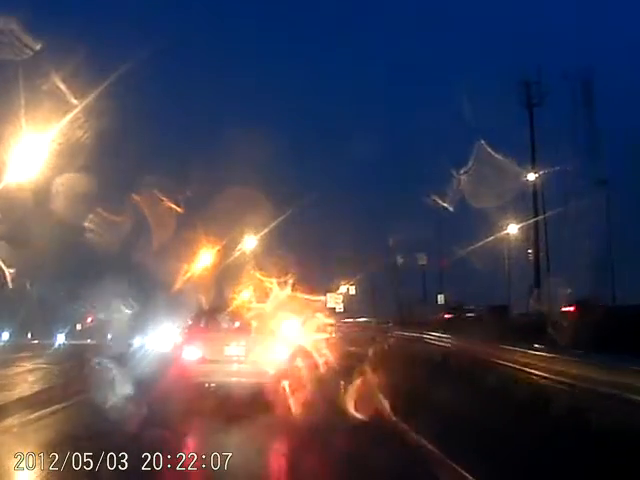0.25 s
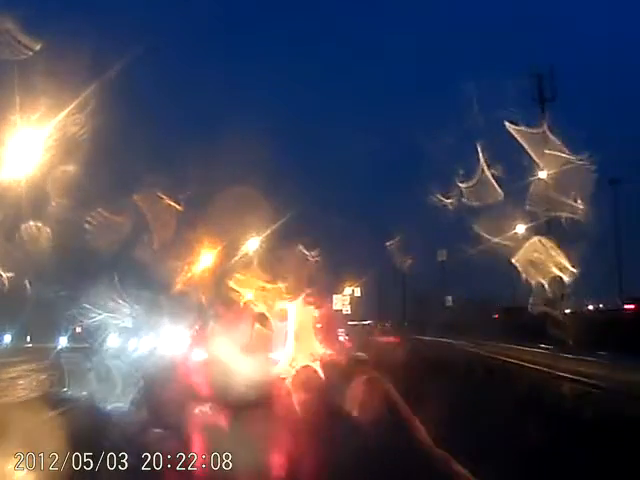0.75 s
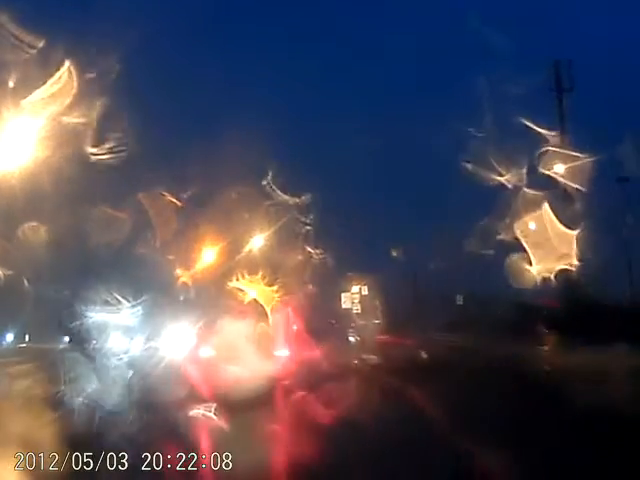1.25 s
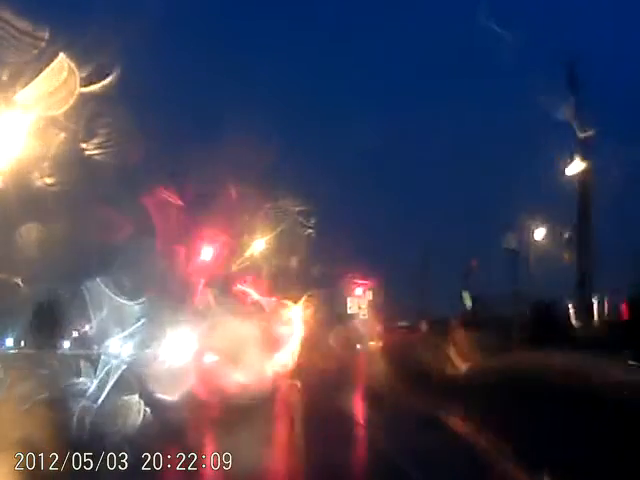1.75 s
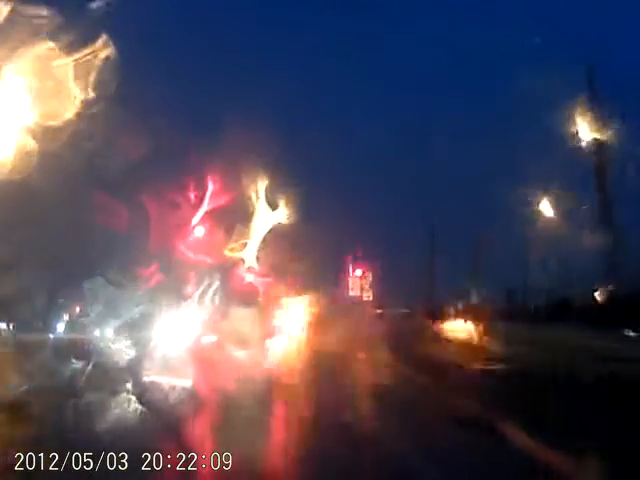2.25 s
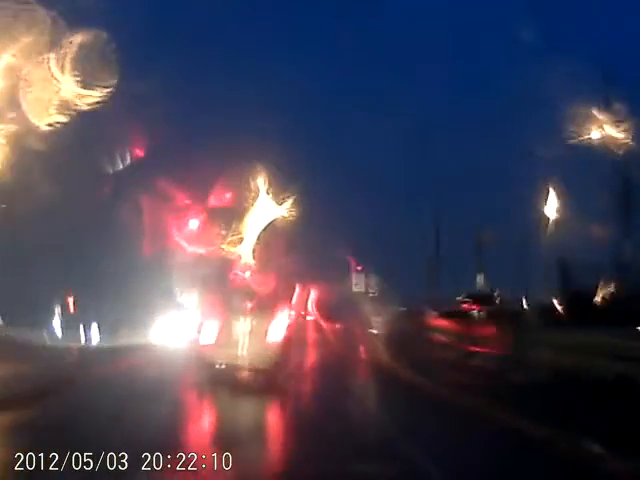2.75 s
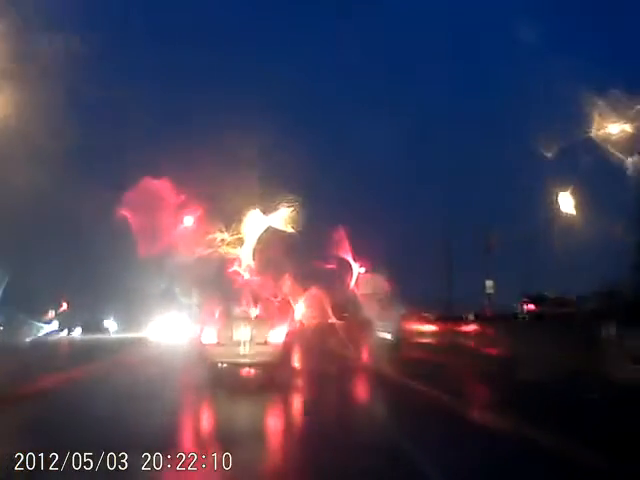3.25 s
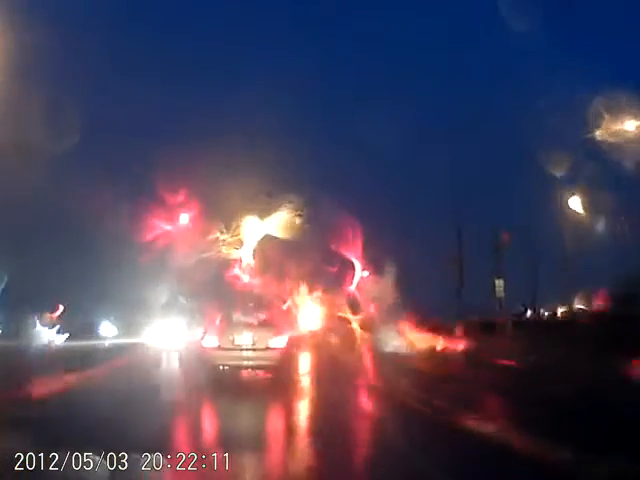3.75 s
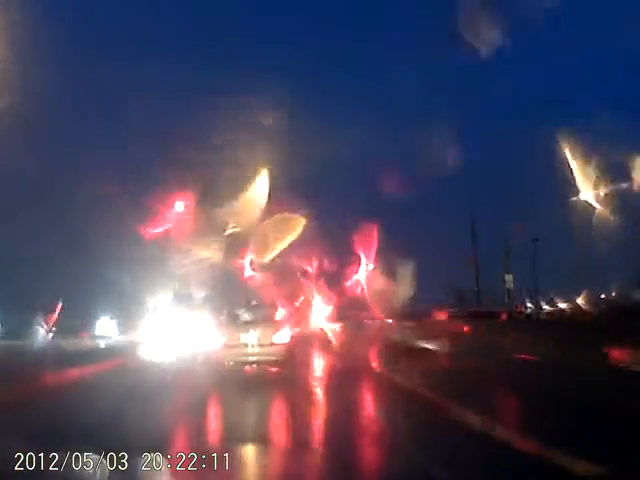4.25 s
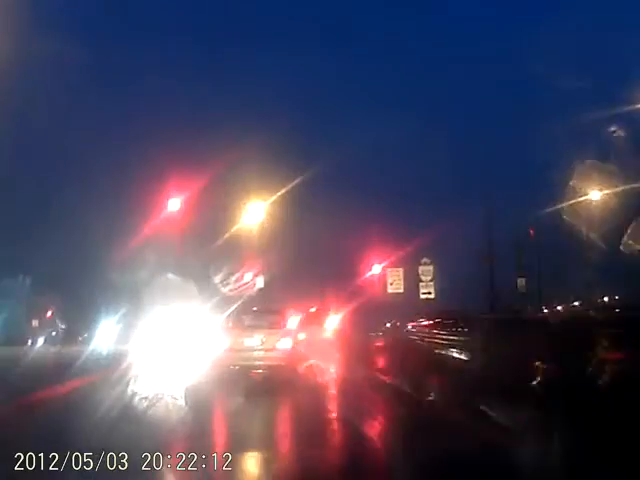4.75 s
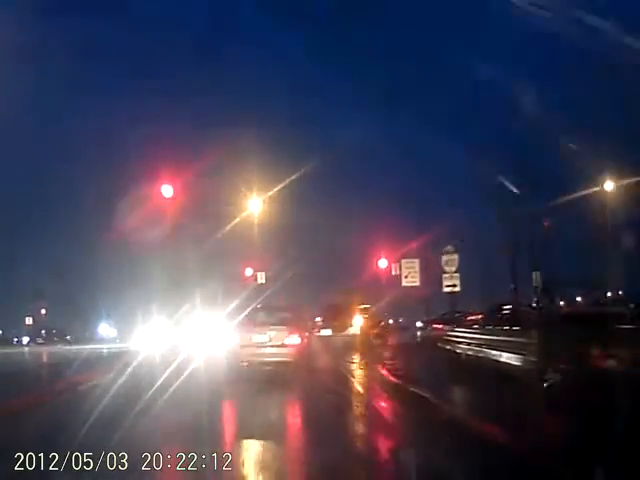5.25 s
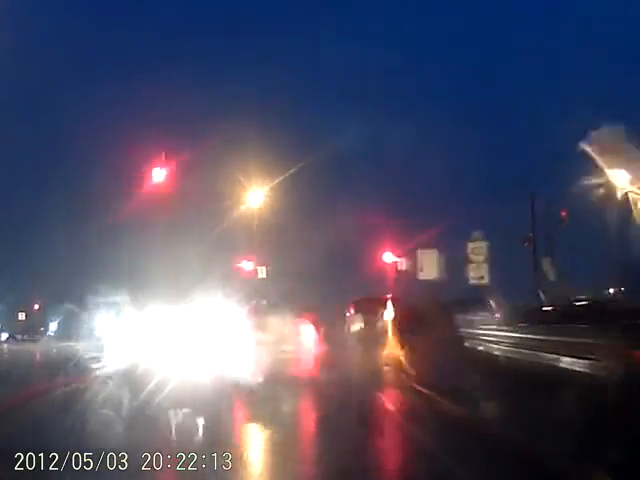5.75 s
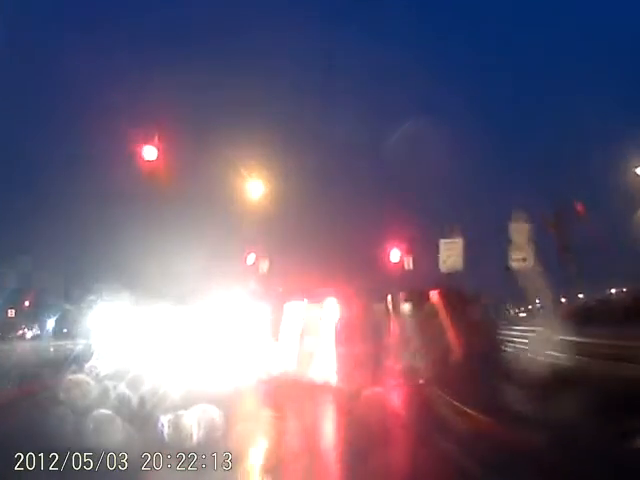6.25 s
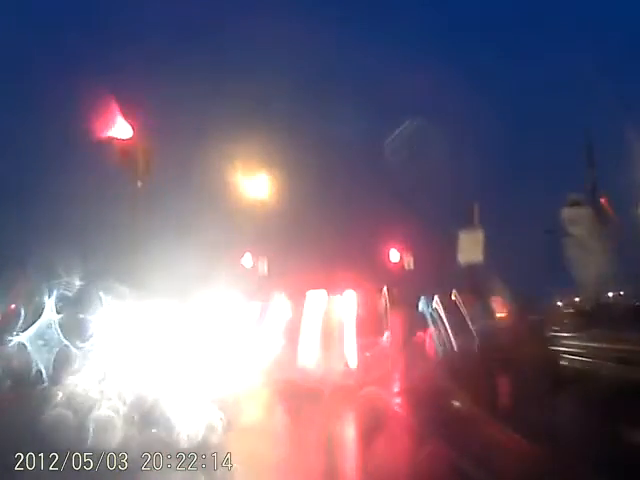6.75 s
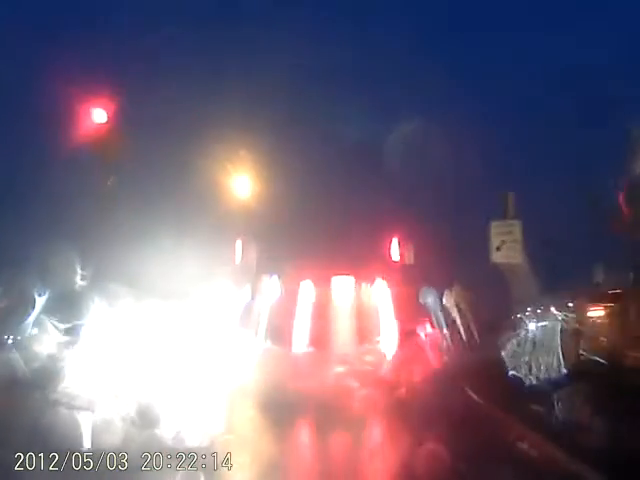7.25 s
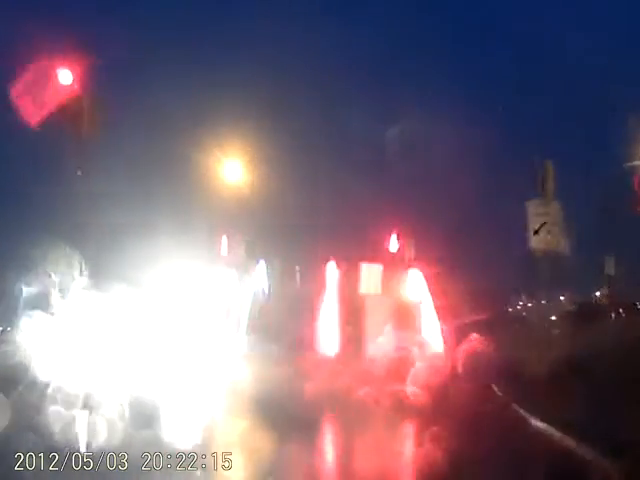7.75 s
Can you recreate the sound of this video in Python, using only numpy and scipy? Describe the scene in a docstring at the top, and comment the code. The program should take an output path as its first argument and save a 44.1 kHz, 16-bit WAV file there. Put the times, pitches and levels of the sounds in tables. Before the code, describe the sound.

Inside a moving car, rain patters densely on windscreen and roof over a low engine drone, wet tyre rumble and deep bump thuds.

```python
"""Rain on a car, heard inside while it pulls along a wet road and then slows.
Something small clinks at once, and a brief hum sags beside the engine. The engine, a stack of harmonics,
pulls and drops through an upshift near 2 s; swinging tones thud at bumps from then on, over filtered-noise
tyres. Plastic clacks at 5.4 s. Throughout, random impulses ringing through the panels make the rain,
which softens from 4.7 s, with crisp fat drops on top and a faint microphone hiss beneath."""
import sys
import numpy as np
from scipy import signal
from scipy.fft import rfft, irfft
from scipy.io import wavfile
from scipy.ndimage import map_coordinates

SR = 44100
rng = np.random.default_rng(int(sys.argv[2]) if len(sys.argv) > 2 else 0)


def wrap_up_sound(samples):
    """Save the sound to the file named by the first command line argument, as 16-bit audio."""
    columns = np.atleast_2d(samples).T
    # keep every value between -1 and 1, then stretch to whole-number steps
    tamed = np.clip(columns, -1, 1)
    steps = np.round(tamed * 32767).astype(np.int16)
    wavfile.write(sys.argv[1], SR, steps)


N = 353064
TIME = np.arange(N) / SR

# engine speed through a pull, an upshift, two more pulls and the slowing: (time [s], firing rate [Hz])
ENGINE_SPEED = [(0, 69.23), (.38, 72.9), (1.8, 80), (2.05, 65.95), (2.4, 45.8), (2.72, 45.62),
                (3.08, 50.74), (3.36, 47.83), (3.63, 41.44), (4.1, 41.3), (4.48, 47.98), (4.86, 49.15),
                (5.1, 62.32), (5.48, 64.8), (5.81, 56.16), (6.15, 51.26), (6.6, 42.56), (8, 39.4)]
# the windscreen and roof as they answer a drop: (frequency [Hz], gain [dB])
PANEL_RESPONSE = [(150, -8.5), (450, -5), (740, 0), (850, 4), (950, 0.5), (1100, 0.5), (1370, 2.5),
                  (1700, -3.5), (2480, -0.5), (2930, -8.5), (3400, -17), (4100, -30), (6000, -42),
                  (15000, -59)]
# tone of the fine spray and ticks: (frequency [Hz], gain [dB])
SPLASH_TONE = [(2000, 8), (4300, -3.5), (5700, 4.5), (7800, 1), (9100, 9), (10300, -4.5), (15000, -19)]


def undb(db):
    """Decibels to gain."""
    return 10 ** (np.asarray(db) / 20)


def level(x, db):
    """Scale to an rms level."""
    return x * undb(db) / np.sqrt(np.mean(x ** 2))


def peak(x, db):
    """Scale to a peak level."""
    return x * undb(db) / np.max(np.abs(x))


def curves(table):
    """Each column of a table, joined by straight lines over time."""
    s, *columns = np.transpose(table)
    return [np.interp(TIME, s, c) for c in columns]


def add(out, s, sound):
    """Mix a short sound in at s seconds."""
    start = max(int(s * SR), 0)
    out[start:start + len(sound)] += sound[:max(N - start, 0)]


def fade(t, t60):
    """Exponential decay, 60 dB down after t60 seconds."""
    return np.exp(-np.log(1000) * t / t60)


def walk(rate):
    """Smooth random wandering with a spread near 1, through `rate` random knots a second."""
    knots = rng.standard_normal(N // 100)
    return map_coordinates(knots, [TIME * rate], order=2, mode="wrap")


def colour(x, points, size=2048):
    """Causal minimum-phase filter whose gain follows (Hz, dB) points."""
    hz, db = np.transpose(points)
    bins = np.maximum(np.fft.rfftfreq(size, 1 / SR), 1)
    gain_db = np.interp(np.log(bins), np.log(hz), db)
    cepstrum = irfft(np.log(undb(gain_db)))
    # folding the cepstrum forward packs the response's energy at its start
    cepstrum[1:size // 2] *= 2
    cepstrum[size // 2 + 1:] = 0
    response = irfft(np.exp(rfft(cepstrum)))
    return signal.oaconvolve(x, response)[:len(x)]


def noise(points, size=2048):
    """Coloured noise with rms 1."""
    return level(colour(rng.standard_normal(N), points, size=size), 0)


def road():
    """The body rumbles on its springs and the wet tyres roar through the floor."""
    # body rumble, swelling and dipping along the road: (time [s], level [dB])
    roughness = [(0, -25.5), (2, -20.5), (3, -26), (4.1, -22), (6.5, -25), (8, -21)]
    # tone of the body rumble: (frequency [Hz], gain [dB])
    rumble_tone = [(8, -12), (17, 3), (24, 2), (31, -4), (45, -4.5), (65, -9.5), (95, -11.5), (130, -11),
                   (170, -26.5), (260, -36), (500, -80.5)]
    # tone of the tyre roar: (frequency [Hz], gain [dB])
    tyre_tone = [(60, -20), (90, 4.5), (128, 0.5), (170, 7.5), (215, 5.5), (275, 2.5), (390, -1.5),
                 (620, -8), (860, -9.5), (1200, -11), (2500, -22.5), (4000, -53.5)]
    start_db, fall_db_per_s = -36.5, 0.34  # the roar sinks steadily
    roar_db_per_octave, cruise_hz = 5, 54.1  # and follows engine speed about its cruising rate
    sway_hz, drum_fall_db_per_s, braking_s = 55.32, 4, 6.6

    rumble_db, = curves(roughness)
    rumble = noise(rumble_tone, size=16384) * undb(rumble_db)
    low_pass = signal.butter(4, sway_hz / (SR / 2), output="sos")
    sway = signal.sosfiltfilt(low_pass, rumble, padtype="even", padlen=SR // 4)
    # under braking the floor drums less; the slow sway stays
    drumming = (rumble - sway) * undb(-drum_fall_db_per_s * np.maximum(TIME - braking_s, 0))

    engine_hz, = curves(ENGINE_SPEED)
    speed_db = roar_db_per_octave * np.log2(engine_hz / cruise_hz)
    tyre_db = start_db - fall_db_per_s * TIME + speed_db
    tyres = noise(tyre_tone, size=4096) * undb(tyre_db + 1.0 * walk(9.8))
    return sway + drumming + tyres


def hum():
    """A short hum beside the engine, with a weak octave, swells and sinks away as its pitch sags."""
    start_s, length_s, hum_db = 0.183, 0.34, -35.5
    start_hz, sag_hz_per_s = 293.4, 32
    t = np.clip(TIME - start_s, 0, length_s)
    phase = 2 * np.pi * np.cumsum(start_hz - sag_hz_per_s * t) / SR
    swell = np.sin(np.pi * t / length_s)
    tone = np.sin(phase) + undb(-10.0) * np.sin(2 * phase)
    return np.sqrt(2) * undb(hum_db) * swell * tone


def loose_things():
    """Something small clinks on two close pitches; later a hard plastic piece clacks and bounces."""
    # the clack and its bounce: (time [s], peak level [dB])
    clacks = [(5.403, -15.5), (5.41, -26)]
    # modes of the plastic piece: (frequency [Hz], relative level [dB], 60 dB decay time [s])
    plastic_modes = [(1158, -23, 0.043), (1690, 11.5, 0.059), (2000, 15, 0.02), (2380, 10.5, 0.022)]
    out, t = np.zeros(N), np.arange(SR // 8) / SR

    clink = np.sin(2 * np.pi * 2130 * t) * fade(t, 0.12)
    clink += .7 * np.sin(2 * np.pi * 1950 * t) * fade(t, 0.16)
    soft_onset = 1 - fade(t, 0.025)
    add(out, .004, peak(clink * soft_onset, -26))

    ring = sum(undb(db) * np.sin(2 * np.pi * hz * t) * fade(t, t60) for hz, db, t60 in plastic_modes)
    for s, db in clacks:
        strike = undb(27.5) * (t == 0)
        cabin = undb(7) * rng.standard_normal(len(t)) * fade(t, .04)
        add(out, s, peak(colour(ring + strike + cabin, PANEL_RESPONSE), db))
    return out


def bumps():
    """Each bump sets the body swinging in a decaying sine and shakes the trim, a burst of noise."""
    # (time [s], peak level [dB], body pitch [Hz], 60 dB ring time [s], trim rattle peak level [dB])
    jolts = [(2.287, -5.5, 35, 0.24, -40), (2.329, -6.5, 30.5, 0.17, -44), (2.521, -10, 29.8, 0.19, -43),
             (3.808, -31, 55, 0.18, -25.5), (3.849, -15, 8.8, 0.39, -50), (4.336, -8, 39.4, 0.15, -22.5),
             (5.33, -17, 19, 0.15, -41), (7.335, -31, 38, 0.22, -30), (7.804, -10.5, 28.6, 0.46, -25.5)]
    # tone of the trim rattle: (frequency [Hz], gain [dB])
    trim_tone = [(60, -10), (150, -0.5), (280, 10), (430, -0.5), (650, -7.5), (1000, -6), (2500, -50)]
    out, t = np.zeros(N), np.arange(SR // 2) / SR
    give = 1 - fade(t, 0.11)  # the tyre softens the blow
    for s, db, hz, ring_s, rattle_db in jolts:
        swing = -np.sin(2 * np.pi * hz * t) * fade(t, ring_s) * give
        add(out, s, peak(swing, db))
        rattle = rng.standard_normal(len(t)) * fade(t, 0.12) * give
        add(out, s, peak(colour(rattle, trim_tone), rattle_db))
    return out


def engine():
    """Harmonics of the firing rate: throttle drives them, cabin resonances boom, uneven combustion shakes."""
    # how hard the engine works: (time [s], gain [dB])
    throttle = [(0, 2), (1.85, 3), (2.15, -15.5), (2.9, 0), (3.4, -3), (4.05, -10.5), (4.3, -2.5), (5.1, 3),
                (5.22, 0.5), (6.1, -4.5), (7.2, -3.5), (8, -7)]
    # engine harmonics: (multiple of the firing rate, relative level [dB])
    harmonics = [(1, -19), (2, -25.5), (3, -32.5), (4, -37.5), (5, -42), (6, -44)]
    # the cabin booms when a harmonic crosses one of its resonances: (frequency [Hz], gain [dB])
    cabin_boom = [(40, -4.5), (49, 1), (53, 0.5), (59, -13), (70, -7), (78, -7), (85, -14), (99, -1),
                  (124, -3), (136, -12), (149, -16.5), (160, -9.5), (192, -0.5), (230, -9), (255, -20),
                  (322, -8.5), (365, -7.5), (480, -10.5)]
    hz, = curves(ENGINE_SPEED)
    throttle_db, = curves(throttle)
    boom_hz, boom_db = np.transpose(cabin_boom)
    phase = 2 * np.pi * np.cumsum(hz) / SR
    out = np.zeros(N)
    for multiple, db in harmonics:
        cabin_db = np.interp(np.log(multiple * hz), np.log(boom_hz), boom_db)
        shake_db = 1.2 * walk(10)
        gain = np.sqrt(2) * undb(db + throttle_db + cabin_db + shake_db)
        out += gain * np.sin(multiple * phase + rng.uniform(0, 2 * np.pi))
    return out


def easing_db(s):
    """The rain hits harder as the car gathers way, and more softly once it slows."""
    slowing_s, rise_db_per_s, fall_db_per_s = 4.68, 0.05, 1.1
    before_s, after_s = np.maximum(slowing_s - s, 0), np.maximum(s - slowing_s, 0)
    return -rise_db_per_s * before_s - fall_db_per_s * after_s


def impact(hz, ring_db, ring_s, cabin_db, cabin_s):
    """One drop: a sharp push, a short ring of the spot it hits, and scattered cabin reflections."""
    t = np.arange(SR // 8) / SR
    push = 1. * (t == 0)
    ring = np.cos(2 * np.pi * hz * t) * fade(t, ring_s)
    cabin = rng.standard_normal(len(t)) * fade(t, cabin_s)
    return -(push + undb(ring_db) * ring + undb(cabin_db) * cabin)


def patter(per_s, spread_db, limit_db):
    """Drops at random moments: very many small ones, a few large."""
    falls = rng.random(N) < per_s / SR
    return falls * undb(np.minimum(spread_db * rng.exponential(size=N), limit_db))


def rain(count=14):
    """Drops land on many spots, each with its own ring; large ones splash, and fine spray ticks on the glass."""
    rain_db = -38 + easing_db(TIME)
    knocks, splashes = np.zeros(N), np.zeros(N)
    for hz in np.geomspace(750, 2600, count):
        hits = patter(per_s=60, spread_db=5.2, limit_db=13)
        drop = impact(hz, ring_db=-28, ring_s=0.014, cabin_db=-15.5, cabin_s=0.045)
        knocks += signal.oaconvolve(hits, drop)[:N]
        spray_hits = patter(per_s=30, spread_db=4.6, limit_db=13)
        # squaring lets the large drops dominate the splashing
        splashes += (hits + spray_hits) ** 2 * rng.standard_normal(N)
    t = np.arange(SR // 20) / SR
    spray = signal.oaconvolve(splashes, rng.standard_normal(len(t)) * fade(t, 0.018))[:N]
    shower = level(colour(knocks, PANEL_RESPONSE), 0) + level(colour(spray, SPLASH_TONE), -24.5)
    flurries_db = .7 * walk(22)
    return shower * undb(rain_db + flurries_db)


def fat_drops(count=28):
    """Heavy drops nearby knock crisply out of the patter; sharp noise ticks sound on the glass."""
    # the heaviest drops: (time [s], peak level [dB], ring [Hz])
    heavy_drops = [(1.069, -20.5, 1030), (1.149, -19, 1190), (1.442, -22, 970), (1.568, -20.5, 1380),
                   (2.774, -18.5, 2000), (2.835, -21, 700), (2.856, -22, 910), (3.406, -19, 860),
                   (3.474, -21, 820), (3.66, -22, 1300), (4.235, -23, 2330), (4.886, -21, 1260),
                   (6.592, -22.5, 840), (6.883, -23.5, 1400), (6.943, -24.5, 1000)]
    # the sharpest ticks on the nearby glass: (time [s], peak level [dB])
    sharp_ticks = [(1.6656, -36), (1.8253, -38), (2.157, -39), (2.2687, -38), (2.3271, -35), (2.8604, -40),
                   (3.4057, -40), (4.1535, -40), (4.2353, -36), (5.4021, -41), (5.9449, -40), (7.6979, -38)]
    # lesser drops fall at random, each with a tick
    stray_drop_db, stray_tick_db, stray_spread_db = -28.5, -44.5, 2.5
    low_hz, high_hz = 820, 2520
    out, t = np.zeros(N), np.arange(SR // 20) / SR

    knocks, ticks = [*heavy_drops], [*sharp_ticks]
    for when, size, spot in rng.random((count, 3)):
        s = when * N / SR
        offset_db = stray_spread_db * (2 * size - 1) + easing_db(s)
        knocks.append((s, stray_drop_db + offset_db, low_hz * (high_hz / low_hz) ** spot))
        ticks.append((s, stray_tick_db + offset_db))

    for s, db, hz in knocks:
        knock = impact(hz, ring_db=-23, ring_s=.009, cabin_db=-23, cabin_s=.055)
        add(out, s, peak(colour(knock, PANEL_RESPONSE), db))
    # the drop bursts, then its spray lands: a fast decay over a weaker, slower one
    envelope = fade(t, 0.0086) + undb(-5) * fade(t, 0.033)
    for s, db in ticks:
        add(out, s, peak(colour(rng.standard_normal(len(t)) * envelope, SPLASH_TONE), db))
    return out


def scene():
    """Everything that reaches the dashboard, as one channel."""
    return (road() + hum() + loose_things() + bumps() + engine() + rain() + fat_drops())[None]


def record(dry):
    """A small microphone adds a faint even hiss and cuts the top with a steep low-pass filter."""
    # tone of the hiss: (frequency [Hz], gain [dB])
    hiss_tone = [(100, -16), (4000, 3), (9000, 2.5), (11000, 1), (14000, 0), (15700, -6)]
    top_hz = 15600
    hiss = undb(-61) * noise(hiss_tone)
    low_pass = signal.ellip(8, .2, 70, top_hz, fs=SR, output="sos")
    return signal.sosfilt(low_pass, dry + hiss)


dry = scene()
out = record(dry)
wrap_up_sound(out)
```